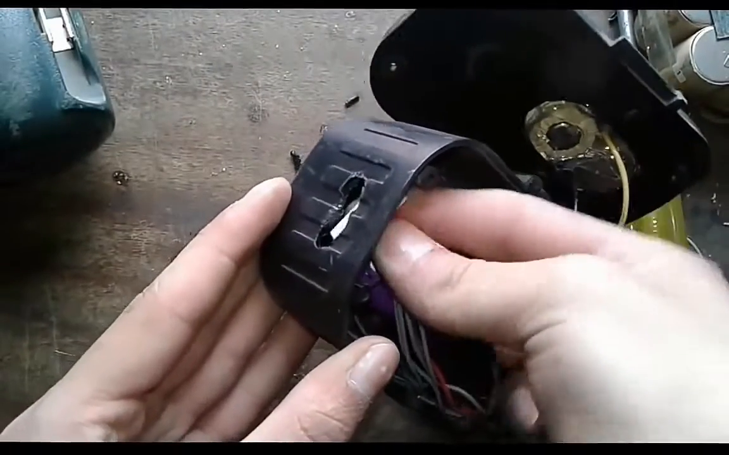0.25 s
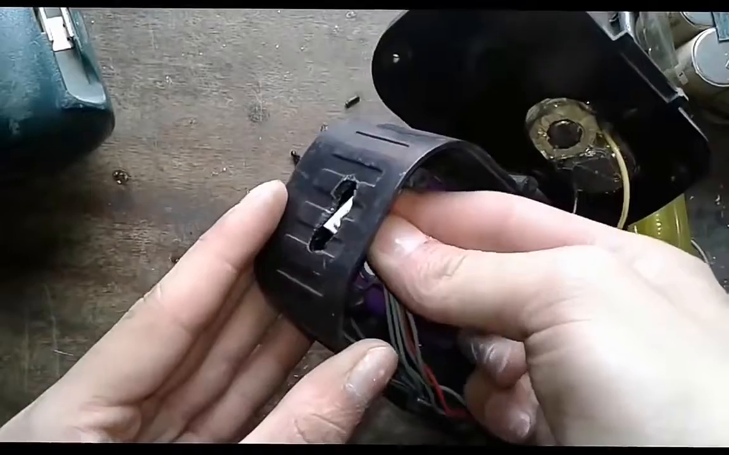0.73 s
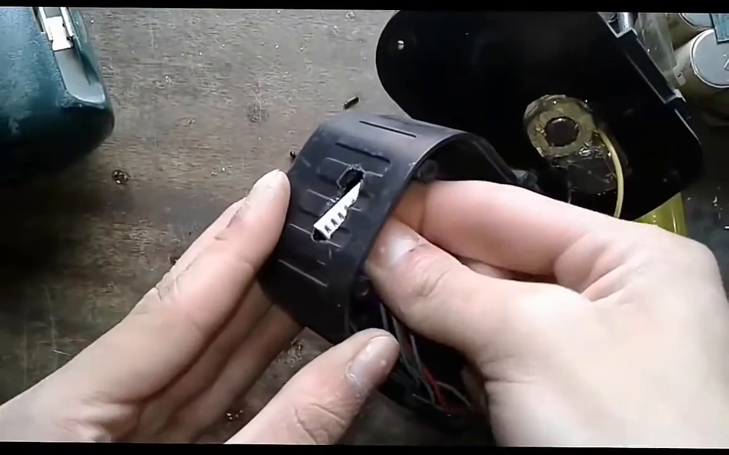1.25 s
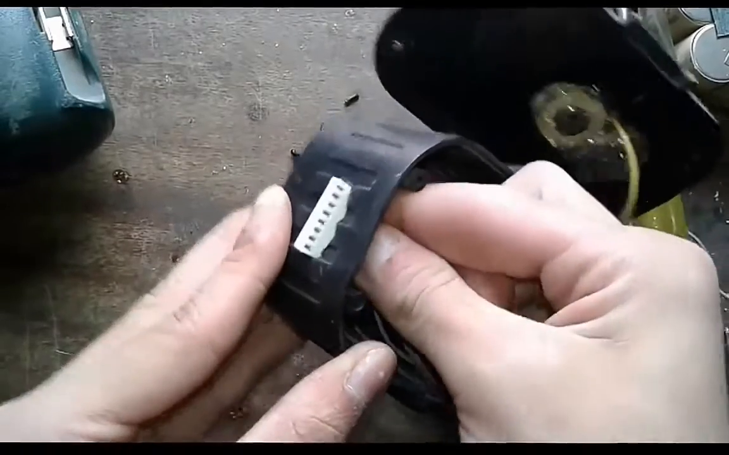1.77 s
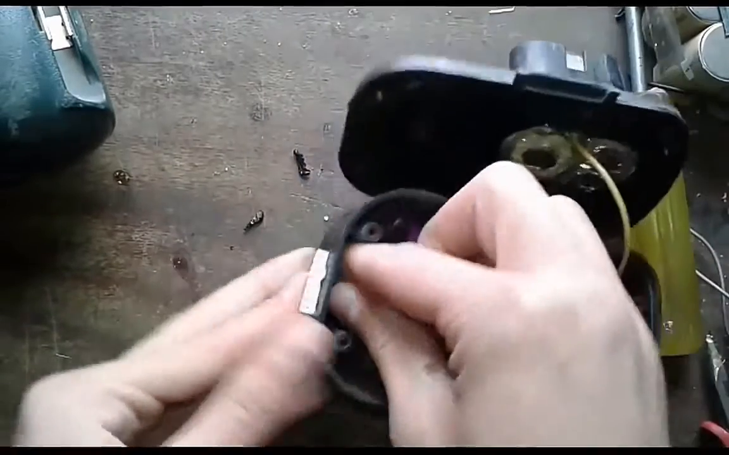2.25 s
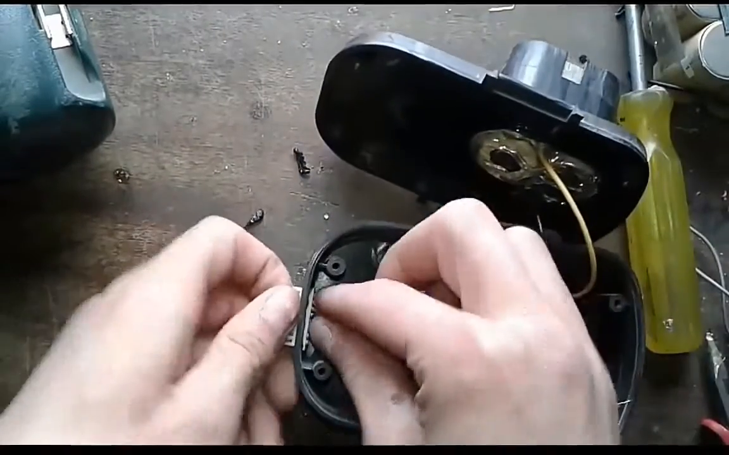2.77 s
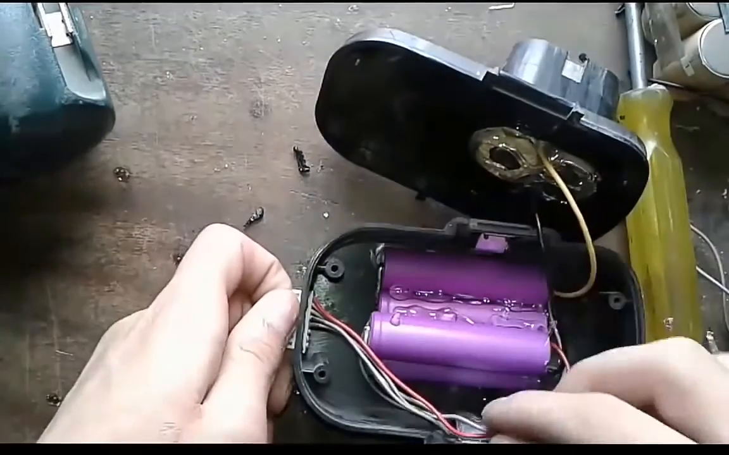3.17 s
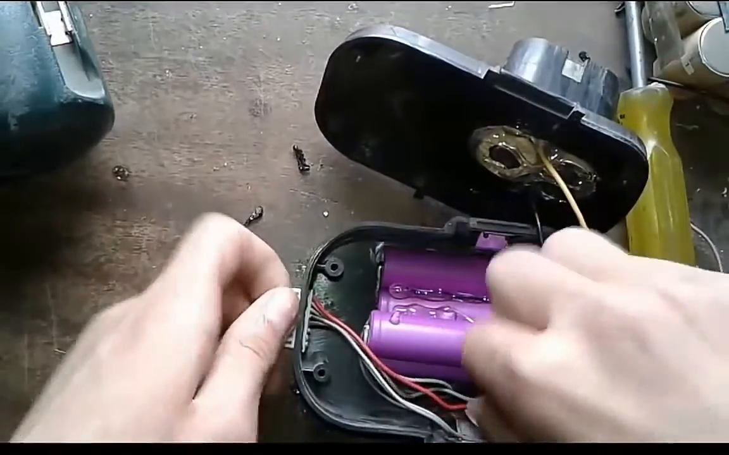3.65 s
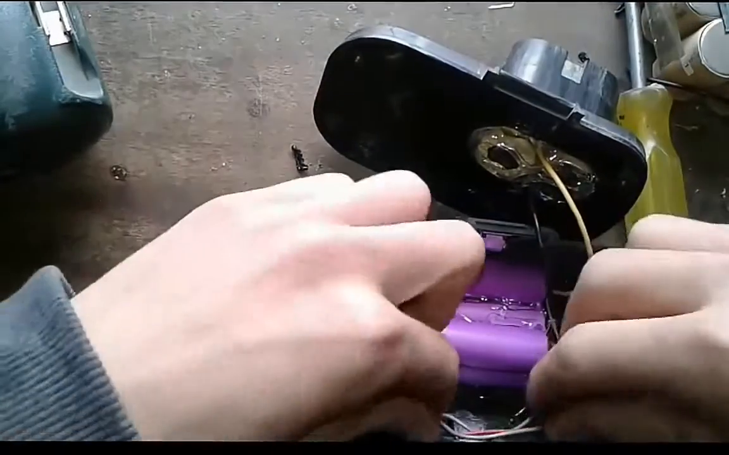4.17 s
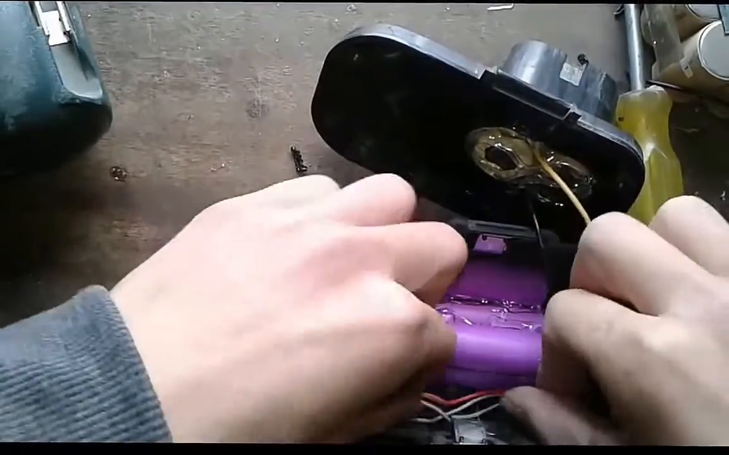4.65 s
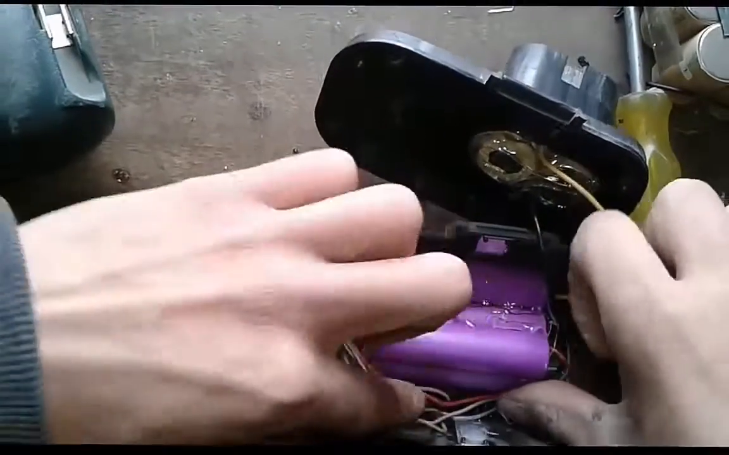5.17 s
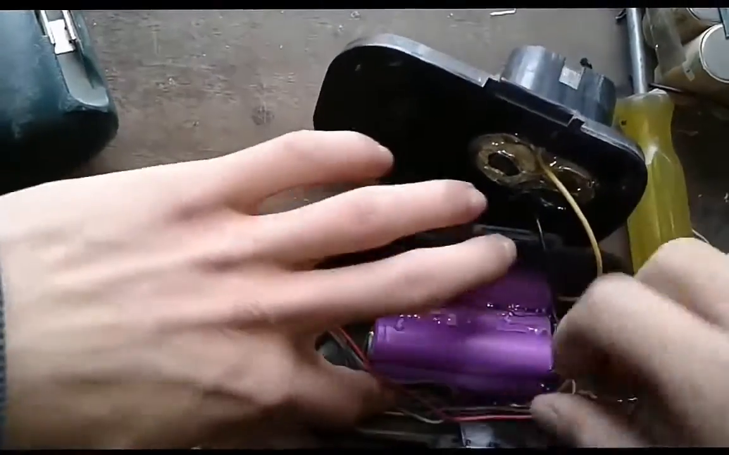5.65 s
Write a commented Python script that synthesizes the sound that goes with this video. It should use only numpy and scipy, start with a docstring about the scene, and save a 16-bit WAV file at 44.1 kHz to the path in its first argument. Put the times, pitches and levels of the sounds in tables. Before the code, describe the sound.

A close, dry sound of hands handling a plastic battery case on a wooden bench in a quiet room, with faint low rumble and hiss. From 0 to 1.4 s there are sparse small clicks, bright at about 0.1 and 0.3 s, then firmer and lower near 0.95 and 1.1 s, with a soft push between them. Around 1.4 to 1.6 s come short scrapes and dull hollow bumps. At 1.76 to 1.93 s the case clatters loudly: a dense run of hard, hollow plastic knocks with crisp edges and quick rebounds, ending in a coarse rub. Weaker knocks and a soft thump follow near 2.1 s, then light clicks around 2.6 s. From 3 to 4.9 s it is very quiet: faint wire rustles, finger slides and tiny ticks, slightly clearer at 4.2 to 4.35 s. At about 5.07 s a sharp snap and dull hollow bumps stand out with rubbing, then soft scrapes and ticks fade towards 5.9 s.

```python
"""Battery case on a bench

Hands work on a plastic battery case on a wooden bench, close to a small microphone in a quiet room.
A connector clicks into its slot, the tipped case clatters with its lid, then fingers rub and tuck
the wires and press the cells home. Contacts sum damped modes and noise bursts; rubbing is filtered
random slip; squeaks are wavering tones. A faint room answer, low rumble and hiss lie behind."""
import sys
import numpy as np
from scipy import signal
from scipy.fft import rfft, irfft, next_fast_len
from scipy.io import wavfile
from scipy.ndimage import uniform_filter1d, map_coordinates

SR = 44100
rng = np.random.default_rng(int(sys.argv[2]) if len(sys.argv) > 2 else 0)


def unload_audio(sound):
    """Save the sound as a 16-bit wav file, at the path given as the first command line argument."""
    columns = np.transpose(np.atleast_2d(sound))
    # keep every value between -1 and 1, then stretch to whole-number steps
    steps = np.round(np.clip(columns, -1, 1) * 32767)
    wavfile.write(sys.argv[1], SR, steps.astype(np.int16))


N = 260613

# Case and lid knock on the bench: (time [s], hollow level [dB], bench level [dB], wall level [dB],
# rim level [dB], snap level [dB], favoured wall pitch [Hz], share of the free ring [1])
KNOCKS = [(1.7593, -21, -20, -28, -32, -32.5, 790, 1), (1.785, -33, -25.5, -28, -36, -34.5, 830, 0.95),
          (1.798, -23, -29.5, -21.5, -34, -29.5, 1470, 1), (1.807, -34, -20.5, -17, -19.5, -17.5, 1550, 1),
          (1.8124, -22.5, -30, -23.5, -26, -19, 1434, 1), (1.8517, -38.5, -39, -10, -23, -30, 1410, 0.65),
          (1.871, -19.5, -15.5, -19, -18.5, -22.5, 1453, 0.7),
          (1.892, -31.5, -24.5, -28.5, -32.5, -39, 850, 1), (1.906, -40.5, -24, -33, -40, -40, 1010, 0.88),
          (1.933, -24.5, -40, -37, -43, -38, 1450, .55), (2.128, -35.5, -35.5, -30.5, -47.5, -39, 766, 0.5),
          (2.1339, -44, -61.5, -32.5, -42, -44, 1435, 0.96)]
# Plastic edges and wires snap into place: (time [s], snap level [dB], nominal share reaching the
# walls [dB], nominal share reaching the hollow [dB], pitch of the snap [Hz])
CLICKS = [(0.074, -40.5, -1.5, -11.5, 6300), (0.3226, -39.5, 8, -2.5, 6660), (0.6128, -53, -1.5, .5, 6060),
          (0.952, -40, -.5, -8, 2860), (1.094, -32.5, -4.5, -5.5, 2970), (1.718, -44, -10, -26, 6800),
          (2.068, -44.5, -13.5, 0.5, 6240), (2.554, -41.5, -16, -20, 5340), (2.603, -37, -10, -21.5, 3760),
          (2.615, -49, -8.5, -21.5, 7530), (3.021, -66, -9, -19, 5870), (3.082, -60, -7, -18.5, 6610),
          (3.2, -51.5, -13.5, -14, 4270), (3.508, -54, -9.5, -20, 6340), (3.526, -48.5, -14, -20, 5860),
          (3.87, -59.5, -4, -3.5, 2750), (4.176, -44.5, -13.5, -14, 6560), (4.253, -42.5, -15, -17, 6520),
          (4.348, -38, -14, -18, 6750), (4.855, -53.5, -6, -6, 6770), (5.0635, -32.5, -15, -31, 7000),
          (5.644, -54.5, -7.5, -20, 7200), (5.695, -49, -10.5, -18, 6850)]
# Pushes on connector and cells, soft bumps of the case: (time [s], hollow level [dB], hardness [dB])
BUMPS = [(1.017, -48, -13), (1.253, -57, -20), (1.493, -46.5, -13), (1.507, -36.5, -11), (1.539, -44.5, -9),
         (1.594, -52, -6), (2.036, -62, 3.5), (2.298, -59, -13), (3.298, -62, -10.5), (4.632, -59.5, -6),
         (5.077, -35, -11.5), (5.107, -48, -2), (5.164, -41.5, -14), (5.259, -51, -12)]
# The heel of a hand presses the case on the bench: (time [s], level [dB])
THUMPS = [(0.341, -50), (2.131, -47), (5.1, -60)]
# Short slides of fingers and wires: (time [s], nominal length [s], level [dB], pitch of the scrape [Hz])
SLIDES = [(0.022, 0.09, -62, 5330), (1.408, 0.059, -51.5, 4300), (1.469, .08, -56.5, 4500),
          (1.729, .015, -45, 6300), (2.09, 0.064, -46.5, 5200), (2.444, 0.079, -62.5, 5070),
          (2.566, .046, -44.5, 4900), (3.165, 0.069, -54.5, 4370), (3.438, .12, -57, 5490),
          (3.53, 0.034, -53, 5990), (4.208, 0.0477, -44, 3140), (4.303, .06, -53.5, 5840),
          (4.389, .035, -61, 6630), (4.642, .04, -61.5, 5490), (4.862, 0.23, -52, 5250),
          (5.192, 0.064, -48.5, 6700), (5.323, 0.0737, -51, 6130), (5.546, 0.079, -65, 5940),
          (5.601, .063, -59, 6570), (5.637, .06, -55, 4060)]
# How hard skin rubs on the case: (time [s], nominal level [dB])
RUB_LEVEL = [(0.0, -67), (0.1, -75), (0.89, -75.5), (1.1, -76), (1.45, -64.5), (1.6, -63.5), (1.79, -51),
             (1.91, -35), (1.97, -54), (2.19, -64), (2.72, -77), (3.37, -70), (3.72, -80), (4.87, -67),
             (5.03, -55), (5.17, -50.5), (5.37, -69.5), (5.91, -69.5)]
# How hard the case is dragged on the bench: (time [s], nominal level [dB])
DRAG_LEVEL = [(0.0, -63), (0.89, -107), (1.15, -81), (1.36, -64.5), (1.99, -52.5), (2.24, -65), (2.73, -83),
              (3.29, -73.5), (3.9, -84.5), (4.25, -73), (4.87, -71.5), (5.08, -50.5), (5.4, -71),
              (5.91, -72)]
# Faint, thin squeaks: (time [s], length [s], starting pitch [Hz], level [dB])
SQUEAKS = [(0.0, 0.063, 5500, -81), (0.456, 0.11, 5500, -73), (0.914, 0.13, 5500, -67),
           (2.722, 0.27, 3580, -80), (4.101, 0.23, 570, -70.5), (4.517, .12, 1000, -75.5)]

# Modes of the air in the hollow case: (frequency [Hz], mean strength [dB], free t60 [s])
HOLLOW_MODES = [(139.94, -19, 0.16), (200, -25.5, 0.18), (303, -1.5, 0.19), (337.1, -17, 0.21)]
# Modes of the case against the bench top: (frequency [Hz], mean strength [dB], free t60 [s])
BENCH_MODES = [(381.9, -2.5, 0.34), (379, -3, 0.087), (413, -0.5, 0.14), (488, -2, 0.099),
               (544, -2.5, 0.089), (629.7, 2, 0.11)]
# Modes of the plastic walls: (frequency [Hz], mean strength [dB], free t60 [s])
WALL_MODES = [(780, -3, 0.15), (965, -6.5, 0.053), (984.7, 0, 0.078), (1120, -5.5, 0.064),
              (1298, -3.5, 0.089), (1390, -0.5, 0.13), (1490, -5, 0.084), (1500, 0, 0.11),
              (1635, -9.5, 0.11)]
# Modes of the rim of the case: (frequency [Hz], mean strength [dB], free t60 [s])
RIM_MODES = [(1985, 3.5, 0.17), (2170, -6, .07), (2193, -1.5, .1), (2274, -2.5, 0.037), (2442, -3, 0.089)]
# Modes of the stiff ribs inside it: (frequency [Hz], mean strength [dB], free t60 [s])
RIB_MODES = [(3004, 0.5, 0.1), (3276, 0.5, 0.088), (3740, -10, 0.02), (3671, -7.5, 0.014),
             (3970, -1.5, .045), (4960, -3, 0.043), (5300, -4, 0.051), (5800, -2.5, 0.057),
             (6262, -3, 0.09), (6840, -2.5, 0.088)]

# Colour of the unpitched attack of the bench: (frequency [Hz], gain [dB])
THUD_COLOUR = [(30, -25.5), (100, -20.5), (200, -17.5), (400, -3), (580, -8), (850, -22), (1500, -57)]
# Colour of the unpitched attack of the walls: (frequency [Hz], gain [dB])
CLACK_COLOUR = [(500, -42), (720, -4.5), (1000, -1.5), (1400, -1.5), (1650, -6.5), (2100, -24),
                (3500, -54.5)]
# Colour of the unpitched attack of the rim: (frequency [Hz], gain [dB])
CRACK_COLOUR = [(1100, -49), (1750, -1.5), (2300, -1.5), (2750, -5), (3400, -20.5), (5000, -51.5)]
# Colour of the snap at the touching edge: (frequency [Hz], gain [dB])
SNAP_COLOUR = [(1700, -46), (2750, -5), (3150, -5.5), (3700, -1), (4500, 1), (5700, -0.5), (7000, 1),
               (8000, -5), (10000, -36)]
# Colour of the tick on top of the snap: (frequency [Hz], gain [dB])
TICK_COLOUR = [(5500, -47.5), (8000, 4.5), (9200, 2), (11000, -2.5), (16000, -12)]
# Colour of rubbing on the plastic: (frequency [Hz], gain [dB])
RUB_COLOUR = [(300, -37.5), (500, -4.5), (900, -1.5), (1400, -2.5), (1900, -3), (2700, -2.5), (4500, -7.5),
              (5700, -5.5), (6700, -6), (7600, -6.5), (9000, -10.5), (12000, -14.5), (16000, -16.5)]
# Colour of room rumble and microphone hiss: (frequency [Hz], gain [dB])
AIR_COLOUR = [(20, -24.5), (45, -12.5), (68, -1), (110, -10.5), (200, -13.5), (500, -19.5), (1500, -26),
              (2500, -27), (3400, -26.5), (5000, -31), (10000, -35.5), (16000, -33)]
# Decay of the room: (frequency [Hz], t60 [s])
ROOM_DECAY = [(200, 0.6), (1500, 0.33), (6000, 0.32), (15000, 0.093)]

TOP_HZ = 16000  # band limit of the microphone
BLOW_S = .012  # span over which the strength of a blow is set
T = np.arange(SR // 5) / SR  # time axis of one contact [s]

KNOCK_RISE_S, KNOCK_T60_S, KNOCK_SNAP_HZ = 0.00055, 0.055, 3170  # build-up, decay and pitch of the snap
REBOUND_S, REBOUND_LOSS_DB = .0098, 15.5  # every knock rebounds once

# build-up at reference stiffness, decay of the snap, share of the free ring left by the grip
CLICK_RISE_S, CLICK_T60_S, CLICK_FREE = .0011, .064, .76
CLICK_HALVING_DB = 14.5  # this much more wall share halves the build-up
CLICK_WALL_HZ = 1520  # the wall modes near this pitch answer most

BUMP_RISE_S, BUMP_T60_S, BUMP_FREE = 0.0012, 0.12, 0.77  # same three quantities for a bump
BUMP_WALL_HZ, BUMP_SNAP_HZ = 876.5, 4807
RIM_SPOT_HZ = 2393  # the rim answers most here to a pointed contact

DULL_DB, BRIGHT_DB, DRAG_DB = -0.5, -0.5, -4  # trims: rub below and above 4.5 kHz, dragged case
RUB_MID_DB, DULL_GROWS = -59, 1.15  # a firmer touch than this rubs duller, a lighter one brighter
CATCH_PER_S, CATCH_DB = 90, -5  # mean rate of catches, level relative to the rub curve
CATCH_SPREAD_DB = 4  # scatter of the sizes of the tiny catches
SQUEAK_SAG_PER_S = 0.21  # share of the starting pitch lost in a second
SQUEAK_WAVER = .035  # random pitch deviation, as a share of the starting pitch


def amp(db):
    """Logarithmic level: decibels to amplitude gain."""
    return 10 ** (np.asarray(db) / 20)


def unit(x):
    """Power normalisation: scale to rms 1."""
    return x / np.sqrt(np.mean(x ** 2) + 1e-20)


def blow(x):
    """Onset normalisation: scale a ring to rms 1 over its first moments."""
    return x / np.sqrt(np.mean(x[:int(BLOW_S * SR)] ** 2) + 1e-20)


def along(points, hz):
    """Logarithmic interpolation: read (frequency, value) points on a log-frequency axis."""
    f, v = np.transpose(points)
    return np.interp(np.log(hz + 1), np.log(f + 1), v)


def coloured(x, gain_db):
    """Minimum-phase filtering: a folded cepstrum makes a causal filter from a gain curve in dB."""
    m = 2 * next_fast_len(len(x) // 2 + SR // 20)
    log_gain = np.log(amp(gain_db(np.fft.rfftfreq(m, 1 / SR))))
    cepstrum = irfft(log_gain, m)
    cepstrum[1:m // 2] *= 2
    cepstrum[m // 2 + 1:] = 0
    response = np.exp(rfft(cepstrum))
    return irfft(rfft(x, m) * response, m)[:len(x)]


def bump(hz, centre_hz, octaves):
    """Resonance weighting: a bell of height 1 on the log-frequency axis."""
    return np.exp(-.5 * (np.log2((hz + 1) / centre_hz) / octaves) ** 2)


def wobble(rate):
    """Slow random modulation: a smooth curve through rate random knots a second."""
    knots = rng.standard_normal(int(N * rate / SR) + 4)
    return map_coordinates(knots, [np.arange(N) * rate / SR])


def add(track, s, sound):
    """Superposition: mix a sound into the track at s seconds."""
    part = track[max(round(s * SR), 0):][:len(sound)]
    part += sound[:len(part)]


def onset(rise):
    """Contact compliance: the sound builds up as the parts press together."""
    return 1 - np.exp(-(T / rise) ** 2)


def ring(modes, scatter_db, rise, lift_db=0, free=1):
    """Modal superposition: damped modes, struck at new strengths; a grip shortens their free ring."""
    hz, db, t60 = np.transpose(modes)
    size = amp(db + lift_db + scatter_db * rng.standard_normal(len(hz)))
    sign = (-1) ** np.arange(len(hz))  # successive modes swing in opposite senses
    decay = amp(-60 * T / (max(free, .1) * t60[:, None]))
    waves = decay * np.sin(2 * np.pi * hz[:, None] * T)
    return blow(onset(rise) * ((sign * size) @ waves))


def burst(colour, t60, rise, hold):
    """High modal density: countless close modes act as noise that holds, then dies exponentially."""
    decay = amp(-60 * np.maximum(T - hold, 0) / max(t60, .01))
    shape = onset(rise) * decay
    return blow(coloured(shape * rng.standard_normal(len(T)), colour))


def contact(hollow_db, bench_db, wall_db, rim_db, snap_db, tick_db, wall_hz, snap_hz, t60, rise, free,
            focus_db, ribs_db, thin_db=0):
    """Impact excitation: one contact knocks hollow and bench, rings walls and rim, snaps at the edge."""
    # where the blow lands decides which modes answer most; a small edge barely moves the lowest wall mode
    def wall_lift(hz):
        return focus_db * bump(hz, wall_hz, octaves=0.14) - thin_db * bump(hz, 720, octaves=0.21)

    rim_lift = lambda hz: 0.72 * focus_db * bump(hz, RIM_SPOT_HZ, octaves=0.088)
    rib_lift = lambda hz: 6 * bump(hz, snap_hz, octaves=0.27)
    wall_lift_db = wall_lift(np.transpose(WALL_MODES)[0])
    rim_lift_db = rim_lift(np.transpose(RIM_MODES)[0])
    rib_lift_db = rib_lift(np.transpose(RIB_MODES)[0])
    hollow = ring(HOLLOW_MODES, scatter_db=1, rise=2 * rise, free=free)
    bench = ring(BENCH_MODES, scatter_db=6.5, rise=rise, free=free)
    walls = ring(WALL_MODES, scatter_db=4.5, rise=rise, lift_db=wall_lift_db, free=free)
    rim = ring(RIM_MODES, scatter_db=3.5, rise=rise, lift_db=rim_lift_db, free=free)
    ribs = ring(RIB_MODES, scatter_db=4.5, rise=rise, lift_db=rib_lift_db, free=free)
    # short, unpitched attacks
    thud = burst(lambda hz: along(THUD_COLOUR, hz), t60=0.15, rise=rise, hold=0.0009)
    clack = burst(lambda hz: along(CLACK_COLOUR, hz) + wall_lift(hz), t60=0.079 * free, rise=rise, hold=0.0012)
    crack = burst(lambda hz: along(CRACK_COLOUR, hz) + rim_lift(hz), t60=0.075 * free, rise=rise, hold=0.0036)
    snap = burst(lambda hz: along(SNAP_COLOUR, hz) + rib_lift(hz), t60=t60, rise=rise, hold=0.0054)
    tick = burst(lambda hz: along(TICK_COLOUR, hz), t60=.8 * t60, rise=rise, hold=.002)
    low = amp(hollow_db) * hollow + amp(bench_db) * blow(bench + amp(-0.5) * thud)
    wall_sound = amp(wall_db) * blow(walls + amp(1.0) * clack)
    rim_sound = amp(rim_db) * blow(rim + amp(6.0) * crack)
    high = amp(snap_db) * blow(snap + amp(ribs_db) * ribs) + amp(tick_db) * tick
    return low + wall_sound + rim_sound + high


def knocks():
    """Repeated impact: the tipped case lands edge after edge; each landing rebounds once, more weakly."""
    out = np.zeros(N)
    for s, hollow_db, bench_db, wall_db, rim_db, snap_db, wall_hz, free in KNOCKS:
        for delay, loss_db in (0, 0), (REBOUND_S, REBOUND_LOSS_DB):
            knock = contact(hollow_db, bench_db, wall_db, rim_db, snap_db,
                            tick_db=snap_db - 16.5, wall_hz=wall_hz, snap_hz=KNOCK_SNAP_HZ, t60=KNOCK_T60_S,
                            rise=KNOCK_RISE_S, free=free, focus_db=6, ribs_db=0.5)
            add(out, s + delay, amp(-loss_db) * knock)
    return out


def clicks():
    """Contact stiffness: the stiffer a snap's contact, the faster it starts and the more walls answer."""
    out = np.zeros(N)
    for s, db, case_db, hollow_db, snap_hz in CLICKS:
        rise = CLICK_RISE_S * 2 ** (-case_db / CLICK_HALVING_DB - .5)
        click = contact(hollow_db=db + hollow_db, bench_db=db + 0.73 * hollow_db - 10,
                        wall_db=db + 1.15 * case_db, rim_db=db + .85 * case_db + 0.27,
                        snap_db=db, tick_db=db - 8.0, wall_hz=CLICK_WALL_HZ, snap_hz=snap_hz,
                        t60=CLICK_T60_S, rise=rise, free=CLICK_FREE, focus_db=7, ribs_db=-8, thin_db=5)
        add(out, s, click)
    return out


def bumps():
    """Contact hardness: a soft push sounds mostly the hollow; a harder one wakes stiffer parts too."""
    out = np.zeros(N)
    for s, db, hard_db in BUMPS:
        stiff_db = db + hard_db
        push = contact(hollow_db=db, bench_db=stiff_db + 2.5, wall_db=stiff_db - 1.0, rim_db=stiff_db - 4.5,
                       snap_db=stiff_db - 0.5, tick_db=stiff_db - 8.5, wall_hz=BUMP_WALL_HZ,
                       snap_hz=BUMP_SNAP_HZ, t60=BUMP_T60_S, rise=BUMP_RISE_S, free=BUMP_FREE,
                       focus_db=5, ribs_db=-8.5)
        add(out, s, push)
    return out


def thumps():
    """Soft impact: flesh moves only the lowest swing of the bench, a noise burst centred on 100 Hz."""
    out = np.zeros(N)
    colour = lambda hz: 50 * (bump(hz, 100, octaves=3.05) - 1)
    for s, db in THUMPS:
        add(out, s, amp(db) * burst(colour, t60=0.16, rise=0.0026, hold=0.025))
    return out


def friction(rate, grain_db):
    """Sliding friction: many tiny random slips on top of a smooth rub, swelling in clumps."""
    slips = (rng.random(N) < rate / SR) * rng.standard_normal(N)
    clumps = amp(1.2 * wobble(160))
    return unit(clumps * (rng.standard_normal(N) + amp(grain_db) * unit(slips)))


def through_case(x, count=4):
    """Structural transmission: friction is heard directly and through short, shifting answers of the plastic."""
    # decaying noise stands for each spot's modes; their balance drifts as the fingers move on
    modes = amp(-60 * T / 0.021) * rng.standard_normal((count, len(T)))
    spots = [amp(1.7 * wobble(7)) * signal.fftconvolve(x, m)[:N] for m in modes]
    answer = sum(spots)
    power = np.abs(uniform_filter1d(answer ** 2, SR // 20))
    steady = answer / np.sqrt(power + 1e-12)
    return unit(x + amp(1.5) * steady)


def slides():
    """Transient friction: a fingertip or wire slides a little; the scrape swells quickly and fades."""
    out = np.zeros(N)
    grit = through_case(friction(rate=1200, grain_db=-6.0))
    for s, length, db, pitch_hz in SLIDES:
        u = T / (length / 3)  # the swell peaks at u = 1
        # each slide touches another spot, so its resonances differ
        spot = np.column_stack([np.geomspace(800, 14000, num=40), 1.6 * rng.standard_normal(40)])
        colour = lambda hz: along(RUB_COLOUR, hz) + along(spot, hz) + 9 * bump(hz, pitch_hz, octaves=0.27)
        scrape = coloured(grit[int(s * SR):][:len(T)], colour)
        swell = (u * np.exp(1 - u)) ** 2
        add(out, s, amp(db) * unit(scrape) * swell[:len(scrape)])
    return out


def handling():
    """Friction-driven modes: skin rubs duller or brighter with its force; the dragged case hums low."""
    rub_db = np.interp(np.arange(N) / SR, *np.transpose(RUB_LEVEL))
    drag_db = np.interp(np.arange(N) / SR, *np.transpose(DRAG_LEVEL))
    unsteady_gain = lambda db: amp(db + 1.6 * wobble(40))
    grit = friction(rate=350, grain_db=-3)
    rub = unit(coloured(through_case(grit), lambda hz: along(RUB_COLOUR, hz)))
    high_pass = signal.butter(2, 4500, "high", fs=SR, output="sos")
    bright = signal.sosfiltfilt(high_pass, rub)
    dull = rub - bright
    dull_db = RUB_MID_DB + DULL_GROWS * (rub_db - RUB_MID_DB)
    skin = unsteady_gain(dull_db + DULL_DB) * dull + unsteady_gain(rub_db + BRIGHT_DB) * bright
    drag_slips = friction(rate=1800, grain_db=-0.5)
    hollow = unit(signal.fftconvolve(drag_slips, ring(HOLLOW_MODES, scatter_db=4.5, rise=0.0018))[:N])
    bench = unit(coloured(rng.standard_normal(N), lambda hz: along(THUD_COLOUR, hz)))
    return skin + unsteady_gain(drag_db + DRAG_DB) * (hollow + amp(-2.5) * bench)


def catches():
    """Random impulsive friction: wires and ridges catch under fingers in ticks that grow with the rub."""
    rub_db = np.interp(np.arange(N) / SR, *np.transpose(RUB_LEVEL))
    ticks = (rng.random(N) < CATCH_PER_S / SR) * amp(CATCH_SPREAD_DB * rng.standard_normal(N))
    envelope = signal.fftconvolve(ticks, amp(-60 * T / .016))[:N]
    grains = coloured(envelope * rng.standard_normal(N), lambda hz: along(RUB_COLOUR, hz))
    return amp(rub_db + CATCH_DB) * unit(grains)


def squeaks():
    """Frequency modulation: a thin, unsteady tone swells, sinks a little in pitch and fades."""
    out = np.zeros(N)
    for s, length, pitch_hz, db in SQUEAKS:
        t = np.arange(int(length * SR)) / SR
        hz = pitch_hz * (1 - SQUEAK_SAG_PER_S * t + SQUEAK_WAVER * wobble(1500)[:len(t)])
        tone = np.sin(2 * np.pi * np.cumsum(hz) / SR)
        add(out, s, amp(db) * unit(np.sin(np.pi * t / length) * tone))
    return out


def room(x):
    """Reverberation: convolution with a delayed, decaying noise tail whose treble dies first."""
    hz, t, z = signal.stft(rng.standard_normal(SR // 2), SR, nperseg=256)
    decay = amp(-60 * t / along(ROOM_DECAY, hz)[:, None])
    tail = signal.istft(z * decay, SR, nperseg=256)[1]
    delayed = np.pad(x, (SR // 150, 0))
    return signal.fftconvolve(delayed, tail / np.linalg.norm(tail))[:N]


def air():
    """Stationary background noise: low room rumble and microphone hiss."""
    return amp(-70.0) * unit(coloured(rng.standard_normal(N), lambda hz: along(AIR_COLOUR, hz)))


def scene():
    """Superposition: contacts and slides excite the room; rubbing, squeaks and background are added dry."""
    parts = knocks() + clicks() + bumps() + thumps() + slides()
    close = handling() + catches() + squeaks()
    return (parts + amp(-21.5) * room(parts) + close + air())[None]


def record(dry):
    """Saturation and band limiting: the microphone rounds the loudest peaks and cuts the top."""
    top = .72  # ceiling of the rounded peaks, before the band limit
    held = dry / (1 + np.abs(dry / top) ** 6) ** (1 / 6)
    m = next_fast_len(N + SR // 2)
    passband = np.fft.rfftfreq(m, 1 / SR) < TOP_HZ
    return irfft(rfft(held, m) * passband, m)[..., :N]


dry = scene()
out = record(dry)
unload_audio(out)
```